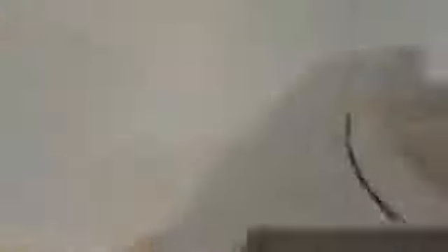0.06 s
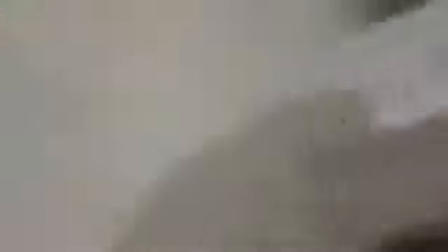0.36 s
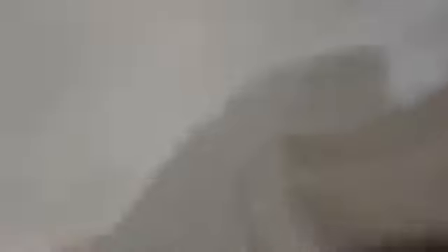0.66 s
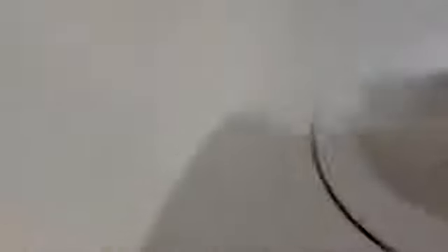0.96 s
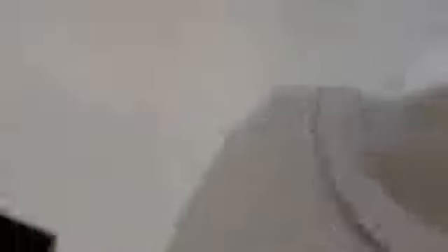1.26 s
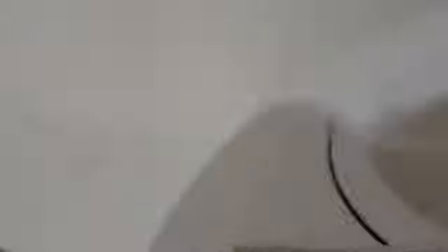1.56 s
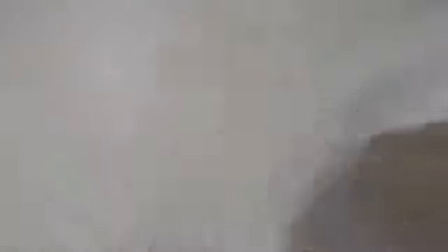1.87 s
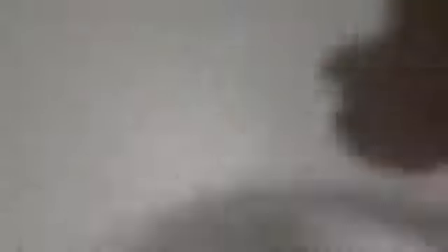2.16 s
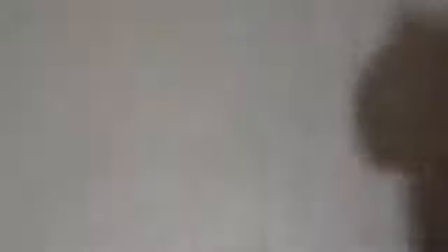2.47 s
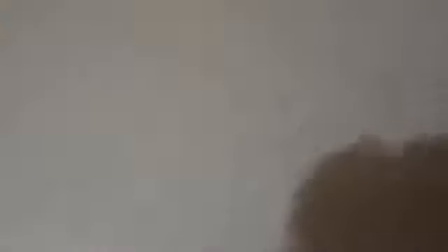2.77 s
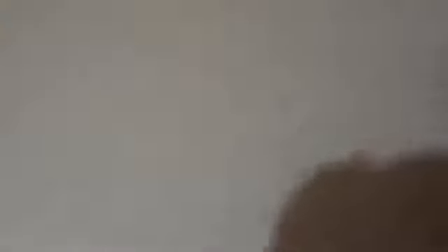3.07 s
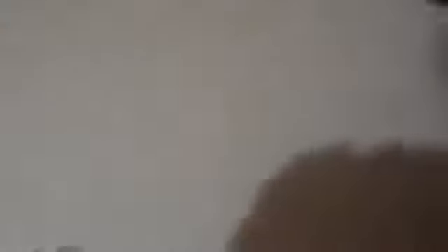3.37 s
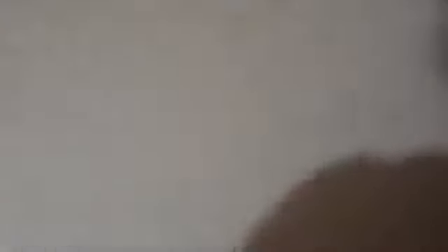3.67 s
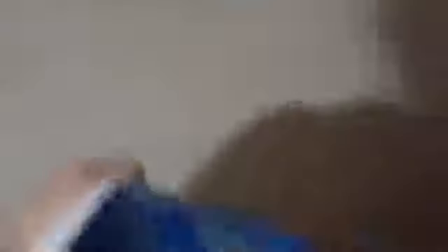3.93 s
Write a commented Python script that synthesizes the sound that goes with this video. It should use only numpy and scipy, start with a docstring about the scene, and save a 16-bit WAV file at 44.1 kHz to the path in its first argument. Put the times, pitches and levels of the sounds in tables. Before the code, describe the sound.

Close knocks and rubs of a handled plastic appliance, with small glugs and a low rumble.

```python
"""Handling a plastic appliance

A small quiet room, microphone close. A hollow plastic appliance is lifted and turned: its shell knocks,
rings and rubs under the hand, and water glugs in its tank. From three seconds on the grip shifts right
at the microphone: a low lumpy rumble, soft thuds and rustling."""
import sys
import numpy as np
from scipy import signal
from scipy.fft import rfft, irfft
from scipy.io import wavfile

SR = 44100
rng = np.random.default_rng(int(sys.argv[2]) if len(sys.argv) > 2 else 0)


def waveform_to_disk(signal):
    """Save audio, clipped to [-1, 1], as 16-bit WAV at the path in sys.argv[1]."""
    frames = np.transpose(np.atleast_2d(signal))
    scaled = np.clip(frames, -1, 1) * 32767
    samples = np.round(scaled).astype(np.int16)
    wavfile.write(sys.argv[1], SR, samples)


N = 176400

# knocks on the shell, before each range's trim and decay ratio:
# start_s, thud_db, hollow_db, clack_db, rattle_db, tick_db, base_decay_s
KNOCKS = [(0.039, -24.5, -29.5, -21, -16, -36, 0.016), (0.082, -18, -22, -20.5, -27.5, -45.5, 0.01),
          (0.174, -51, -21.5, -20.5, -30, -37, 0.0068), (0.192, -51, -33, -25, -28, -54, 0.011),
          (0.3144, -20, -15.5, -15.5, -7.5, -17, 0.0025), (0.415, -26.5, -25, -31, -54, -55, 0.0089),
          (0.428, -22.5, -13.5, -14, -25, -36.5, 0.01), (0.456, -22.5, -27, -16.5, -24, -43, 0.0046),
          (0.542, -38, -32.5, -21, -24, -44.5, 0.0029), (0.606, -41, -29.5, -21, -30.5, -36.5, 0.0078),
          (0.639, -15, -20, -11.5, -16, -27, 0.0041), (0.659, -33, -25.5, -22, -27, -45, 0.016),
          (0.717, -33, -39, -30.5, -44.5, -60, 0.0036), (0.881, -32.5, -16.5, -19.5, -16, -45, 0.0023),
          (0.887, -11.5, -14.5, -13.5, -32, -29.5, 0.0023), (0.993, -30, -30, -31.5, -35.5, -43.5, 0.012),
          (1.018, -23, -36, -24, -35, -53, 0.0049), (1.104, -37.5, -55, -25.5, -30, -42, 0.0064),
          (1.269, -30, -30, -21, -24, -37.5, 0.0079), (1.278, -35, -36, -28, -23.5, -38, 0.004),
          (1.34, -45.5, -42, -26.5, -26.5, -65, 0.0068), (1.531, -27.5, -49, -37.5, -56, -70, 0.0017),
          (1.689, -30, -38, -26, -22, -39, 0.01), (1.704, -24.5, -14, -29, -22.5, -29, 0.0075),
          (1.823, -21.5, -21.5, -14, -14.5, -28, 0.0028), (1.92, -26.5, -46, -48, -57, -70, 0.011),
          (1.958, -20.5, -27.5, -23, -54, -48, 0.008), (2.097, -24, -20.5, -14, -20.5, -31.5, 0.0037),
          (2.156, -43, -26, -20.5, -42, -30.5, 0.012), (2.19, -11, -12.5, -11, -14, -23, 0.0064),
          (2.22, -18, -23, -20.5, -24, -33, 0.0077), (2.288, -45, -32, -23.5, -24.5, -38.5, 0.0061),
          (2.595, -48, -56, -32, -32.5, -33.5, 0.014), (2.94, -59, -48, -62, -32, -56, 0.0073),
          (2.969, -59, -27, -35, -34, -57, 0.017), (3.022, -10, -18.5, -27, -23, -39, 0.0089),
          (3.096, -17, -37, -27, -22.5, -32.5, 0.018), (3.16, -35, -27, -31, -26, -38, 0.017),
          (3.289, -37.5, -25, -26, -27, -48.5, 0.017), (3.372, -7.5, -28.5, -32, -36, -39.5, 0.0051),
          (3.45, -32, -23.5, -42, -19.5, -39.5, 0.0082), (3.578, -15.5, -25.5, -53, -51, -53, 0.0085),
          (3.633, -14.5, -20.5, -33, -23.5, -42, 0.013), (3.783, -26, -19.5, -16, -20, -32.5, 0.0039),
          (3.803, -21.5, -21, -17.5, -17, -28.5, 0.0048), (3.96, -21, -28, -21.5, -73, -46, 0.0085)]
# the hollow, clack, rattle and tick ranges of a knock: low_hz, high_hz, trim_db, decay_ratio
KNOCK_RANGES = [(335.4, 692, -1.5, 1.83), (781, 1242, -4, 1.39), (1355, 3210, -5.5, 1.64),
                (2824, 6670, 2.5, 1.2)]
# the hand sliding between knocks, relative levels: time_s, rub_db, hiss_db
SLIDE_LEVELS = [(0, -29.5, -41), (.14, -34.5, -51.5), (.28, -40, -57), (.39, -26.5, -42), (.51, -28, -44),
                (.6, -33, -49.5), (.78, -43, -60.5), (.86, -33, -46.5), (.95, -40, -53.5),
                (1.06, -41.5, -45), (1.11, -32.5, -40), (1.19, -45, -58.5), (1.26, -41, -49),
                (1.31, -29.5, -36.5), (1.39, -45, -56), (1.5, -43.5, -59), (1.69, -33, -41),
                (1.77, -36.5, -50), (1.81, -22.5, -41), (1.89, -38, -53.5), (2.02, -36.5, -53),
                (2.07, -28.5, -37), (2.14, -34.5, -48), (2.23, -29.5, -62), (2.33, -32, -43.5),
                (2.52, -47, -57.5), (2.66, -40.5, -46.5), (2.85, -56, -64), (3.0, -40, -62)]
# the grip shifting at the microphone, relative levels: time_s, rumble_db, rub_db, hiss_db
GRIP_LEVELS = [(3.01, -63, -42, -63), (3.035, -14, -20.5, -41), (3.11, -19, -28, -36),
               (3.18, -19.5, -23.5, -38), (3.25, -24.5, -35, -46), (3.355, -32, -37, -51),
               (3.385, -9, -24, -37), (3.45, -19.5, -28.5, -37.5), (3.51, -34.5, -31.5, -41.5),
               (3.565, -38, -38, -52), (3.595, -10, -32.5, -41.5), (3.66, -17, -22.5, -51),
               (3.72, -14, -32.5, -49), (3.78, -24, -22.5, -41), (3.815, -25, -18.5, -35),
               (3.86, -14, -26, -37.5), (3.93, -19, -28.5, -46.5), (4.0, -16.5, -21.5, -35.5)]
THUD_HZ = 178.6  # pitch of a thud listed at -14 dB


def from_db(db):
    return 10 ** (np.asarray(db) / 20)


def unit_rms(x):
    return x / np.sqrt(np.mean(x ** 2) + 1e-20)


def gain_curves(rows):
    """Gains from rows of time_s, level_db, ...; silent outside them, but held at the scene's edges."""
    times, *columns = np.transpose(rows)
    t = np.arange(N) / SR
    return [from_db(np.interp(t, times, db, left=db[0] if times[0] < .1 else -120,
                              right=db[-1] if times[-1] > 3.9 else -120)) for db in columns]


def filtered(x, hz, kind, order=2):
    return signal.sosfilt(signal.butter(order, hz, kind, fs=SR, output="sos"), x)


def drift(rate_hz):
    """Smooth random motion with a spread of 1."""
    knots = rng.standard_normal(N // 20)
    return unit_rms(np.interp(np.arange(N) / SR * rate_hz, np.arange(len(knots)), knots))


def coloured(colour):
    """Noise of rms 1, shaped by rows of frequency_hz, level_db and falling away beyond them."""
    hz, db = np.transpose(colour)
    log_hz = np.log(np.arange(N // 2 + 1) * SR / N + 1)
    skirts = np.maximum(np.log(hz[0]) - log_hz, 0) + np.maximum(log_hz - np.log(hz[-1]), 0)
    gain = from_db(np.interp(log_hz, np.log(hz), db) - 20 * skirts)
    return unit_rms(irfft(rfft(rng.standard_normal(N)) * gain, N))


def add(out, start_s, sound):
    i = max(int(start_s * SR), 0)
    out[..., i:i + sound.shape[-1]] += sound[..., :max(N - i, 0)]


def at_level(burst, db):
    """Give a burst the energy of 12 ms at this level."""
    return burst * from_db(db) * np.sqrt(.012 * SR / (np.mean(burst ** 2) * burst.shape[-1] + 1e-20))


def swell(t, rise_s, decay_s):
    return np.minimum(t / rise_s, 1) * np.exp(-np.maximum(t - rise_s, 0) / decay_s)


def strike(t, rise_s, decay_s):
    return (1 - np.exp(-t / rise_s)) * np.exp(-t / decay_s)


def ringing(t, hz, t60_s):
    return np.sin(2 * np.pi * hz * t) * np.exp(-np.log(1000) * t / t60_s)


def room_tone():
    """Faint steady noise, strongest in the bass."""
    return from_db(-59.5) * coloured([(25, -2.5), (150, -3.5), (1000, -22), (2000, -18), (7000, -21.5)])


def room(x, wide_above_hz=580, t60_s=.25):
    """Quick reflections from nearby surfaces and a dull tail, wide only above the bass."""
    t = np.arange(SR) / SR

    def response(decay_s, db):
        centre = filtered(rng.standard_normal(SR), wide_above_hz, "low")
        sides = filtered(rng.standard_normal((2, SR)), wide_above_hz, "high")
        dull = filtered(centre + sides, 3000, "low", order=1)
        envelope = np.exp(-t / decay_s) * np.clip(t / .004 - 1, 0, 1)
        return from_db(db) * dull * envelope / np.sqrt(np.sum(envelope ** 2))

    early = response(decay_s=.013, db=-11)
    tail = response(decay_s=t60_s / np.log(1000), db=-21)
    return signal.fftconvolve(x[None], early + tail, axes=1)[:, :N]


def grip():
    """The shifting hand's lumpy rumble and soft bumps, carried straight into the microphone."""
    # spectrum of the rumble: frequency_hz, level_db
    rumble_colour = [(25, -39), (45, -33), (75, -4), (120, 1.5), (160, 5.5), (220, -7.5), (320, -16),
                     (600, -40.5)]
    # soft bumps of the grip: start_s, pitch_hz, peak_db
    bumps = [(3.025, 151, -16), (3.376, 154, -15), (3.807, 150, -5)]
    rumble = unit_rms(coloured(rumble_colour) * from_db(2 * drift(rate_hz=45)))
    out = from_db(-9) * gain_curves(GRIP_LEVELS)[0] * rumble
    t = np.arange(SR // 8) / SR
    for start_s, hz, db in bumps:
        add(out, start_s, from_db(db) * np.sin(2 * np.pi * hz * t) * swell(t, rise_s=.012, decay_s=.009))
    return out


def rubbing():
    """Skin catches and slips on plastic: a dull rub and a grainy hiss that flutter together."""
    # spectrum of the rub: frequency_hz, level_db
    rub_colour = [(40, -10.5), (90, -6), (200, -0.5), (450, 3), (1000, -2), (1500, -7.5), (2200, -10.5),
                  (3000, -23.5)]
    # spectrum of the hiss: frequency_hz, level_db
    hiss_colour = [(1400, -36), (2100, 2), (3400, 0.5), (5000, -2), (6800, -8), (8000, -14)]
    slide_rub, slide_hiss = gain_curves(SLIDE_LEVELS)
    _, grip_rub, grip_hiss = gain_curves(GRIP_LEVELS)
    slips = drift(rate_hz=110)
    rub = unit_rms(coloured(rub_colour) * from_db(3.5 * slips))
    wide_noise = coloured(hiss_colour) + from_db(.5) * coloured(hiss_colour) * [[1], [-1]]
    grain_db = 4 * (.77 * slips + .46 * drift(rate_hz=900))
    hiss = unit_rms(wide_noise * from_db(grain_db))
    return from_db(-3.5) * (slide_rub + grip_rub) * rub + from_db(1) * (slide_hiss + grip_hiss) * hiss


def crackle(slips_per_s=240, t60_cycles=16):
    """Tiny slips under the hand ring briefly at scattered pitches, following the level of the hiss."""
    pitches_hz = np.geomspace(900, 7000, 16)
    sizes = from_db(2.5 * np.minimum(rng.exponential(1, N), 4))
    slips = sizes * (rng.random(N) < slips_per_s / SR)
    pitch_index = rng.integers(0, len(pitches_hz), N)
    side_gains = rng.uniform(0, 1, (2, N))
    out = np.zeros((2, N))
    for k, hz in enumerate(pitches_hz):
        radius, angle = np.exp(-np.log(1000) * hz / t60_cycles / SR), 2 * np.pi * hz / SR
        kicks = side_gains * slips * (pitch_index == k) + 1e-18
        out += signal.lfilter([0, np.sin(angle)], [1, -2 * radius * np.cos(angle), radius ** 2], kicks)
    hiss_gain = gain_curves(SLIDE_LEVELS)[1] + gain_curves(GRIP_LEVELS)[2]
    return from_db(-5.5) * hiss_gain * unit_rms(out)


def skids(width_hz=1000, swell_s=.0045):
    """A fingertip skids on the plastic with a thin zip of narrow, high friction noise."""
    # fingertip skids: peak_s, centre_hz, level_db
    zips = [(0.995, 5440, -29), (1.306, 5700, -26), (1.653, 6150, -35.5), (1.681, 5740, -24),
            (2.632, 5670, -22.5), (3.421, 6550, -36)]
    out, t = np.zeros(N), np.arange(N) / SR
    friction = rng.standard_normal(N)
    for peak_s, hz, db in zips:
        band = unit_rms(filtered(friction, [hz - width_hz / 2, hz + width_hz / 2], "band"))
        out += from_db(db) * np.exp(-((t - peak_s) / swell_s) ** 2) * band
    return out


def cracks(decay_s=.006, low_cut_hz=1200):
    """Plastic creaks under the grip in short, dry, bright slips."""
    # cracks of the plastic: start_s, level_db
    slips = [(3.054, -38.5), (3.142, -38), (3.162, -29), (3.199, -34), (3.362, -46), (3.375, -33),
             (3.5, -35.5)]
    out, t = np.zeros((2, N)), np.arange(SR // 10) / SR
    for start_s, db in slips:
        noise = rng.standard_normal(len(t)) + rng.standard_normal((2, len(t)))
        add(out, start_s, at_level(filtered(noise * np.exp(-t / decay_s), low_cut_hz, "high"), db))
    return out


def glugs(glide_s=.04, flutter_db=3, overtone_db=-18.5):
    """Pockets of air in the water tank swell, ring and glide in pitch."""
    # air pockets: start_s, pitch_hz, level_db, swell_s, decay_s, glide_octaves_per_s
    pockets = [(.032, 803, -8, 0.013, 0.0077, 3.5), (.052, 907, -10, 0.004, 0.021, 3),
               (.173, 633, -21, 0.01, 0.027, 4.5), (1.268, 590, -16.5, 0.0019, 0.015, 0),
               (1.341, 598, -16.5, 0.0061, 0.0069, 2.5), (2.040, 556.6, -22.5, 0.004, 0.045, 3.5),
               (2.096, 1176, -11, 0.0031, 0.0032, -4), (2.154, 754, -16, 0.0051, 0.028, 1.5),
               (2.911, 369, -25.5, 0.0025, 0.02, 0), (2.969, 331.5, -26, 0.0021, 0.072, 7),
               (3.632, 1109, -20.5, 0.0098, 0.016, 1), (3.739, 923, -20, 0.0081, 0.034, 4),
               (3.783, 443.7, -5.5, 0.0015, 0.017, 2), (3.96, 980, -10.5, 0.004, 0.0026, -1.5),
               (3.976, 950, -25, .008, 0.049, 1)]
    out, t = np.zeros(N), np.arange(SR // 5) / SR
    wobbles, flutters = (np.resize(drift(rate_hz=300), (len(pockets), len(t))) for _ in range(2))
    for (start_s, hz, db, swell_s, decay_s, glide), wobble, flutter in zip(pockets, wobbles, flutters):
        pitch_hz = hz * 2 ** (glide * np.minimum(t, glide_s)) * (1 + .06 * wobble)
        phase = 2 * np.pi * np.cumsum(pitch_hz) / SR
        tone = np.sin(phase) + from_db(overtone_db + flutter_db * wobble) * np.sin(2 * phase)
        add(out, start_s, from_db(db + flutter_db * flutter) * swell(t, swell_s, decay_s) * tone)
    return out


def wall_rings():
    """A struck spot gives a short ping or a hollow boom, its pitch set by how the shell is held."""
    # wall resonances: start_s, pitch_hz, peak_db, t60_s
    resonances = [(.082, 221, -32, .8), (.174, 759, -25, .05), (.3136, 942, -17, .04), (.428, 391, -16, .4),
                  (.428, 807, -22, .06), (.542, 1226, -25, .04), (.607, 613, -27, .08),
                  (.607, 1173, -25, .06), (.64, 1087, -17, .05), (.881, 1555, -19, .05),
                  (.888, 393, -16, .28), (1.018, 393, -25, .28), (1.018, 635, -29, .1),
                  (1.104, 936, -30, .14), (1.701, 500, -19, .08), (2.191, 228, -26, .8),
                  (2.191, 655, -23, .24), (2.22, 455, -27, .26), (3.805, 350, -18, .14),
                  (3.805, 726, -19, .05)]
    out, t = np.zeros(N), np.arange(SR) / SR
    for start_s, hz, db, t60_s in resonances:
        add(out, start_s, from_db(db) * ringing(t, hz, t60_s))
    return out


def shell():
    """Every knock sets the shell's modes ringing, each as strongly as the knock excites its range."""
    # modes of the shell: pitch_hz, gain_db, t60_s
    shell_modes = [(154.3, -25, 0.9), (491, -25.5, 0.33), (950, -23.5, 0.27), (1064, -26.5, .36),
                   (1594, -19.5, 0.19), (2040, -18.5, 0.19), (3060, -19.5, 0.049)]
    out, t = np.zeros(N), np.arange(SR) / SR
    hz, gain_db, t60_s = np.transpose(shell_modes)
    modes = ringing(t, hz[:, None], t60_s[:, None])
    centres_hz = [THUD_HZ] + [np.sqrt(low * high) for low, high, _, _ in KNOCK_RANGES]
    for start_s, *levels_db, _ in KNOCKS:
        drive_db = np.interp(np.log(hz), np.log(centres_hz), levels_db)
        add(out, start_s, from_db(gain_db + drive_db + rng.normal(0, 1, len(hz))) @ modes)
    return out


def knocks(drop_octaves_per_db=.0331, scatter_hz=5150):
    """Each knock on the shell is a damped thud and a quickly dying chatter of tiny contacts."""
    out, t = np.zeros((2, N)), np.arange(SR // 8) / SR
    for start_s, thud_db, *levels_db, base_decay_s in KNOCKS:
        thud_hz = THUD_HZ * 2 ** (-drop_octaves_per_db * (thud_db + 14))  # harder knocks thud lower
        envelope = strike(t, rise_s=.0088, decay_s=.0054 * np.sqrt(base_decay_s / .017))
        add(out, start_s, at_level(np.sin(2 * np.pi * thud_hz * t) * envelope, thud_db - 2.5))
        for db, (low_hz, high_hz, trim_db, decay_ratio) in zip(levels_db, KNOCK_RANGES):
            width = high_hz / (high_hz + scatter_hz)  # the two sides share less in the treble
            contacts = rng.standard_normal(len(t)) + width * rng.standard_normal((2, len(t)))
            grain = from_db(3 * np.repeat(rng.standard_normal(len(t)), 32)[:len(t)])
            chatter = contacts * grain * strike(t, rise_s=.00037, decay_s=base_decay_s * decay_ratio)
            burst = filtered(chatter, [low_hz, high_hz], "band")
            # where the knock lands, one narrow wall resonance stands out of each range
            spot_hz = low_hz * (high_hz / low_hz) ** rng.random()
            spot = signal.iirpeak(spot_hz, Q=19.2 * np.sqrt(high_hz / scatter_hz), fs=SR)
            burst = burst + from_db(3.5) * signal.lfilter(*spot, burst)
            add(out, start_s, at_level(burst, db + trim_db))
    return out


def off_centre(x, pan_db=4, right_lag_s=.00007):
    """The bass is central, the treble leans right, and the right side arrives a little later."""
    bass = filtered(x, 2500, "low", order=1)
    left, right = bass + (x - bass) * from_db([[-pan_db], [pan_db]])
    lag = np.exp(-2j * np.pi * np.arange(N // 2 + 1) * SR / N * right_lag_s)
    return np.array([left, irfft(rfft(right) * lag, N)])


def scene(centred_s=3.04):
    """The hand brings the appliance from one side to the front of the microphone."""
    handling = knocks() + shell() + glugs() + rubbing() + crackle() + cracks() + skids()
    appliance = handling + wall_rings()  # pings and booms are close and dry, without room reflections
    aside = np.clip(2 * (centred_s - np.arange(N) / SR), 0, 1)
    direct = aside * off_centre(appliance) + (1 - aside) * appliance
    return direct + room(handling.mean(axis=0)) + grip() + room_tone()


def record(dry, bottom_hz=49.3, top_hz=7600, dip_db=-29.5, knee=.6):
    """A narrow-band microphone with dips in the treble; peaks above its knee are rounded off."""
    # dips in the microphone's response: centre_hz, width_hz
    dips = [(2590, 1126), (4600, 1150), (5450, 430)]
    for hz, width_hz in dips:
        notched = signal.lfilter(*signal.iirnotch(hz, hz / width_hz, fs=SR), dry)
        dry = dry + (1 - from_db(dip_db)) * (notched - dry)
    dull = signal.sosfilt(signal.ellip(10, .5, 70, top_hz, fs=SR, output="sos"), dry)
    narrow = filtered(dull, bottom_hz, "high")
    clean = np.clip(narrow, -knee, knee)
    overloaded = clean + (1 - knee) * np.tanh((narrow - clean) / (1 - knee))
    return filtered(overloaded, 16000, "low", order=12)


dry = scene()
out = record(dry)
waveform_to_disk(out)
```